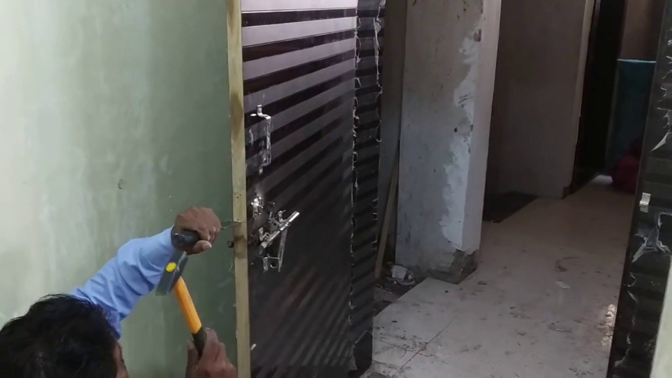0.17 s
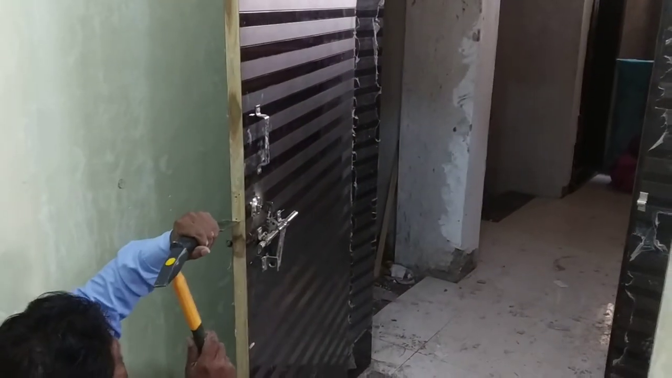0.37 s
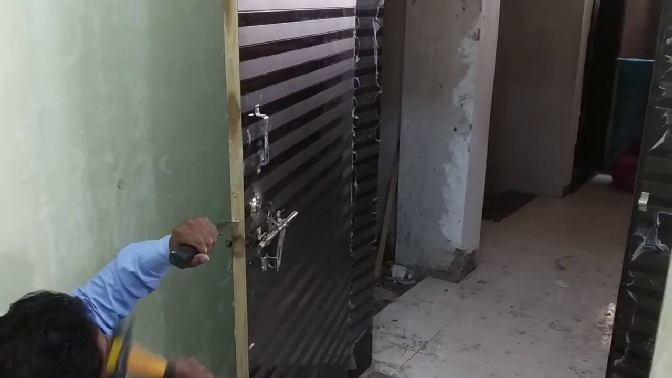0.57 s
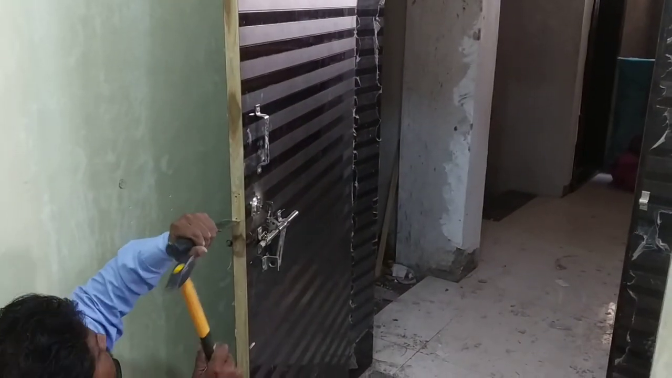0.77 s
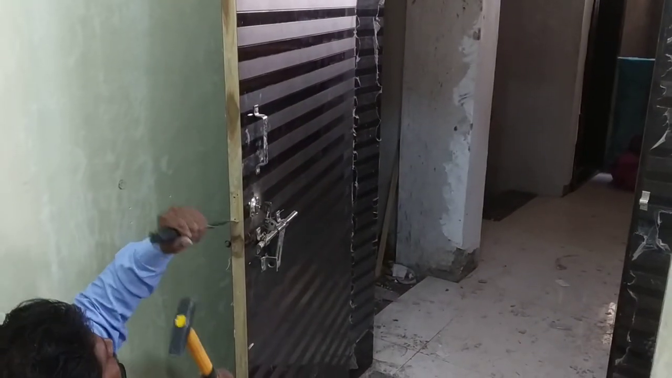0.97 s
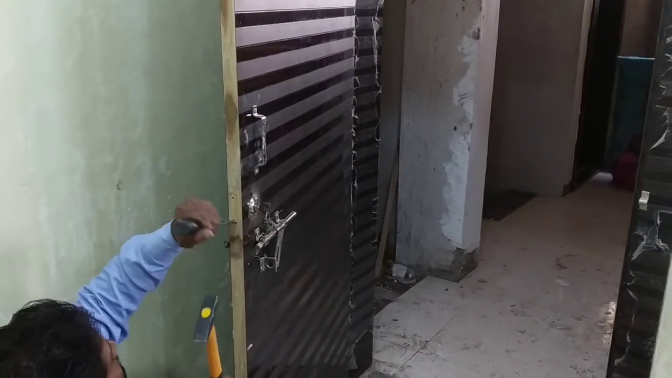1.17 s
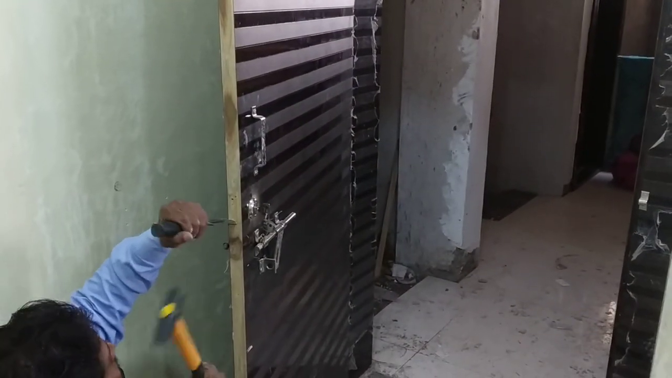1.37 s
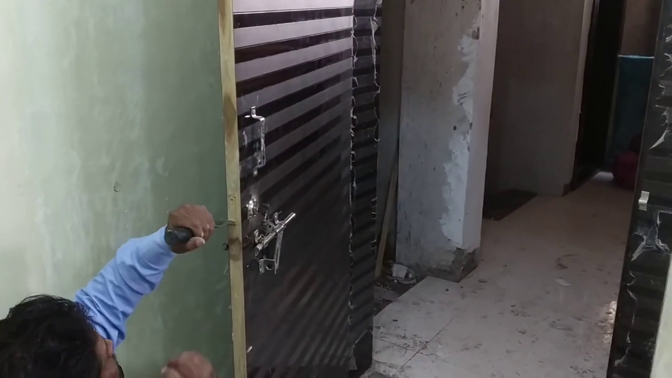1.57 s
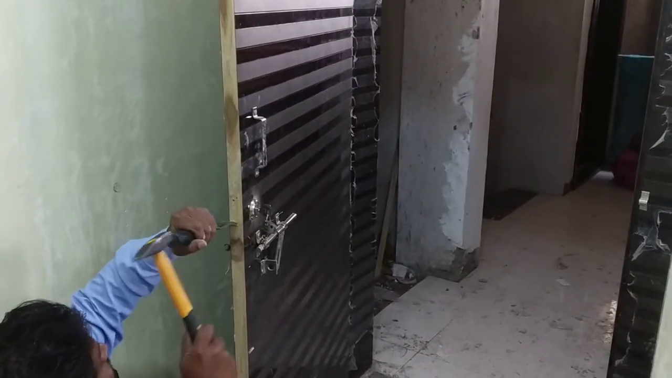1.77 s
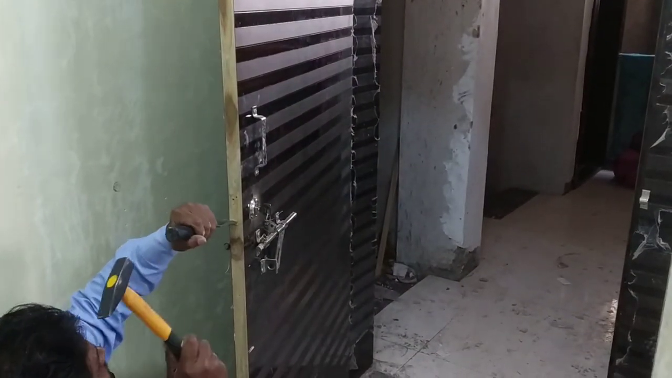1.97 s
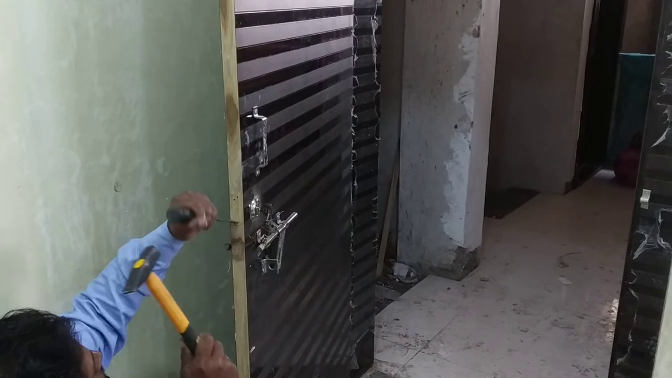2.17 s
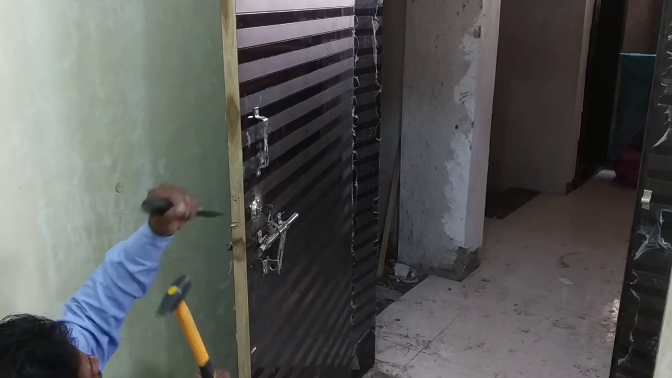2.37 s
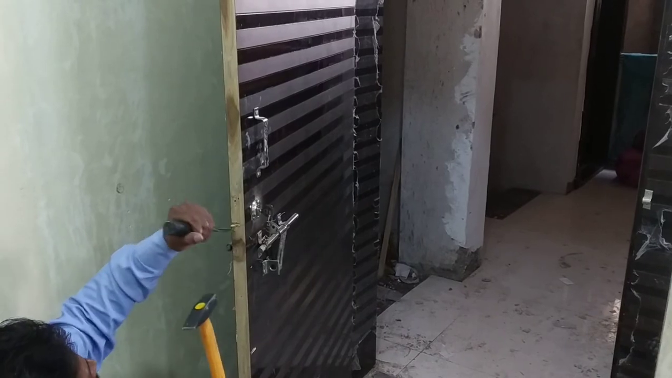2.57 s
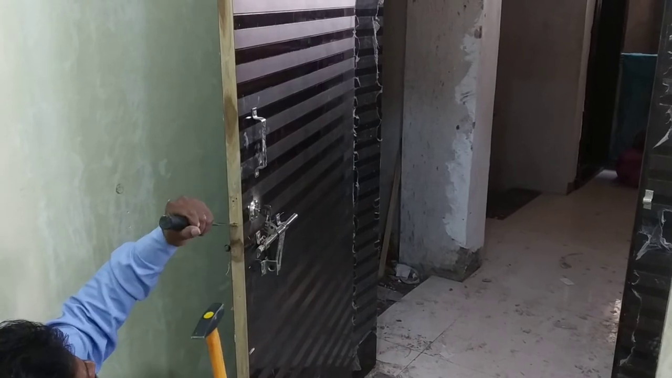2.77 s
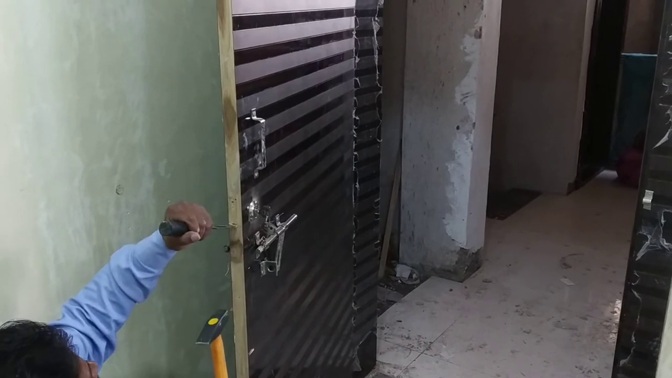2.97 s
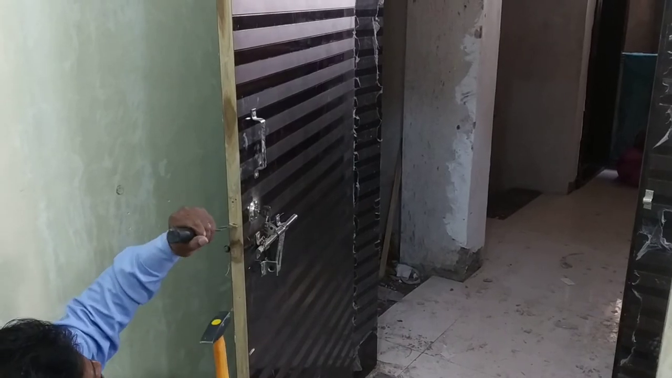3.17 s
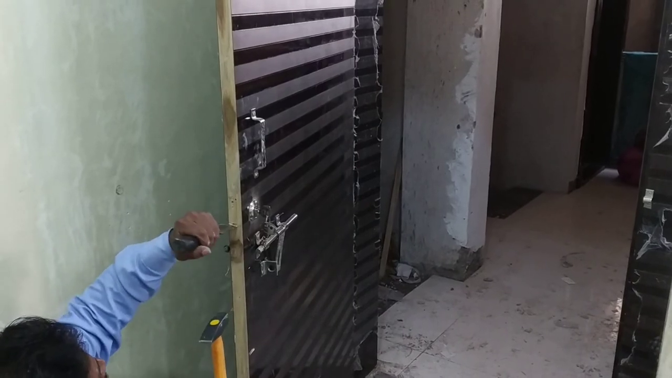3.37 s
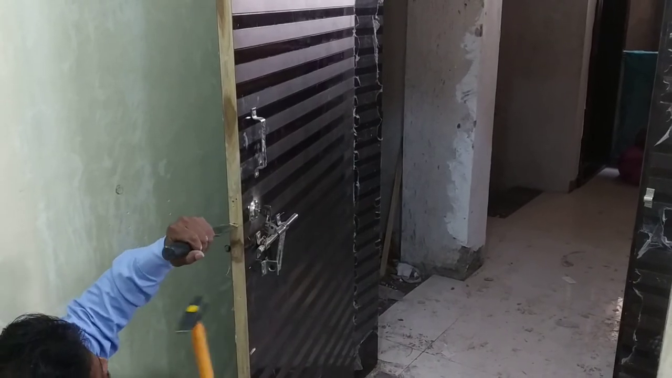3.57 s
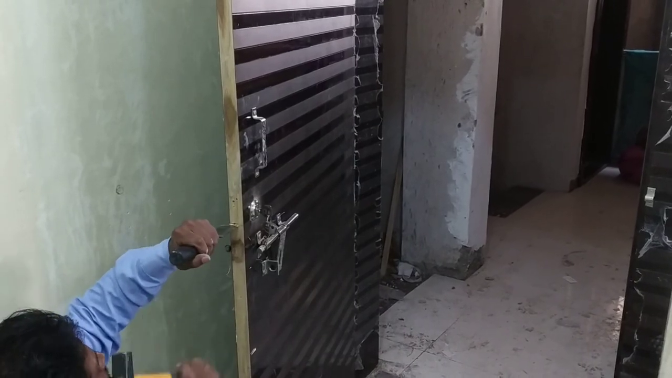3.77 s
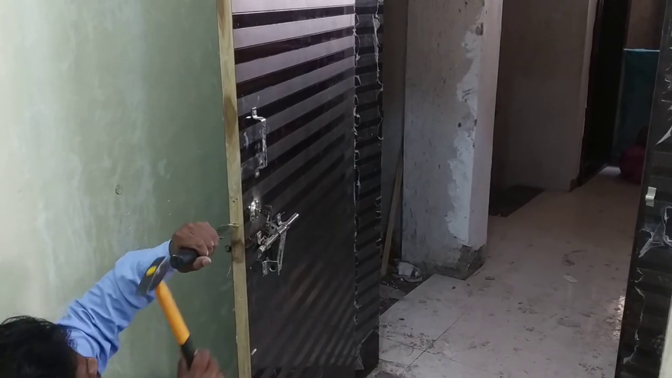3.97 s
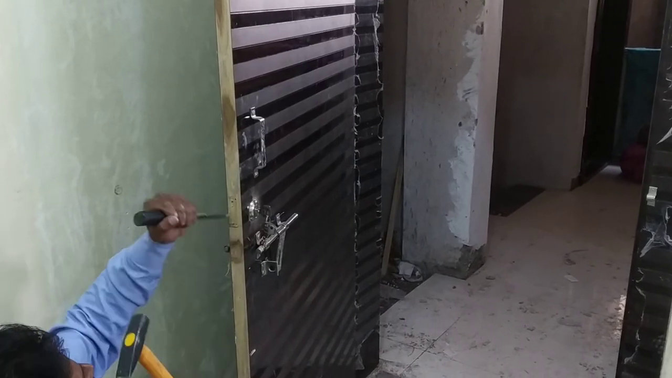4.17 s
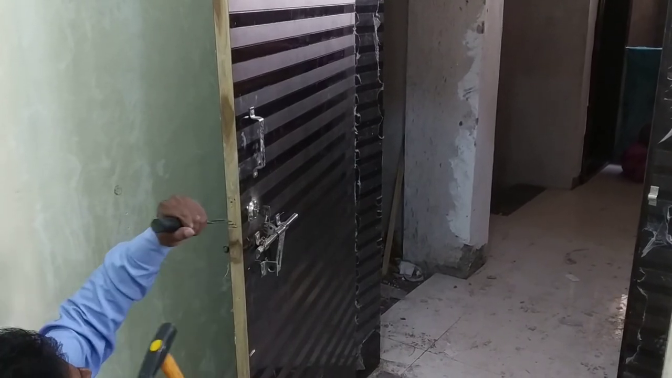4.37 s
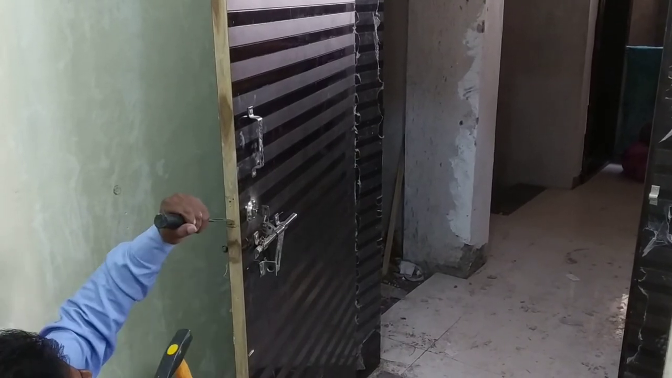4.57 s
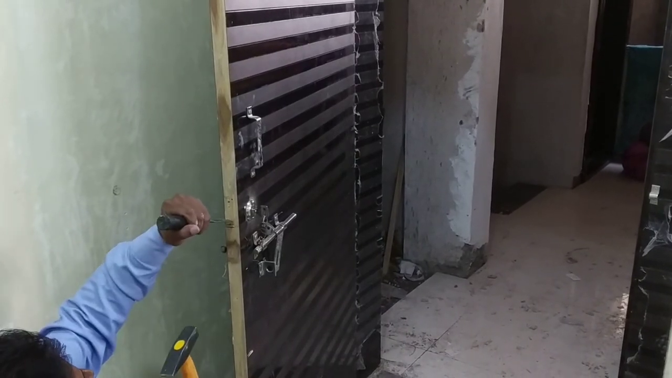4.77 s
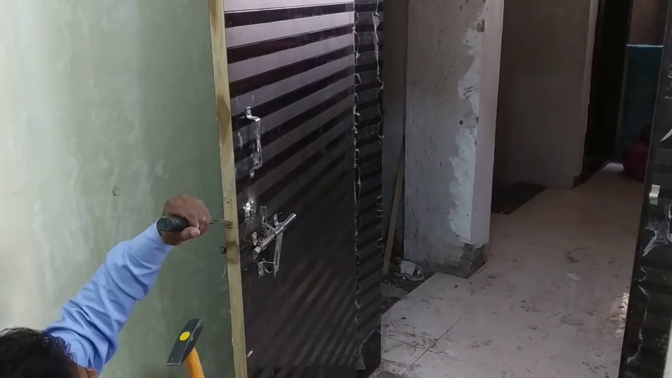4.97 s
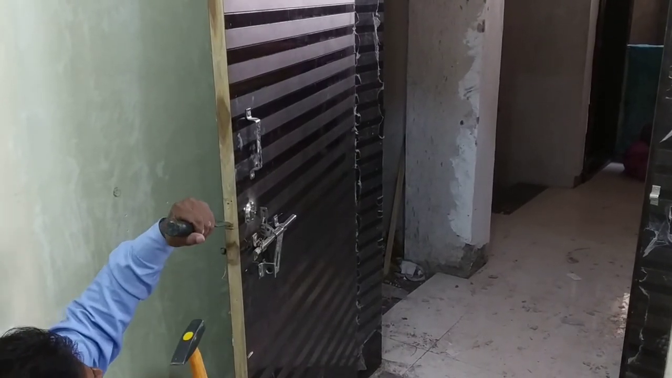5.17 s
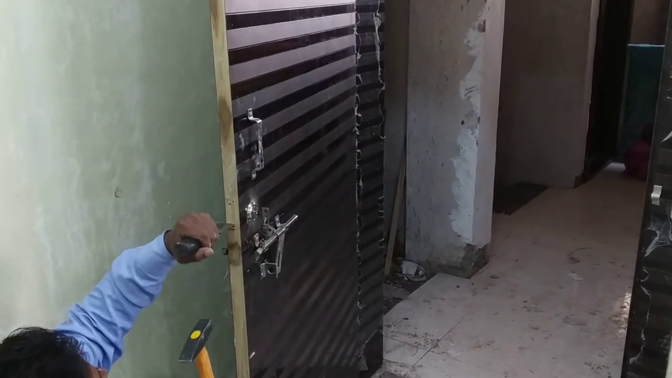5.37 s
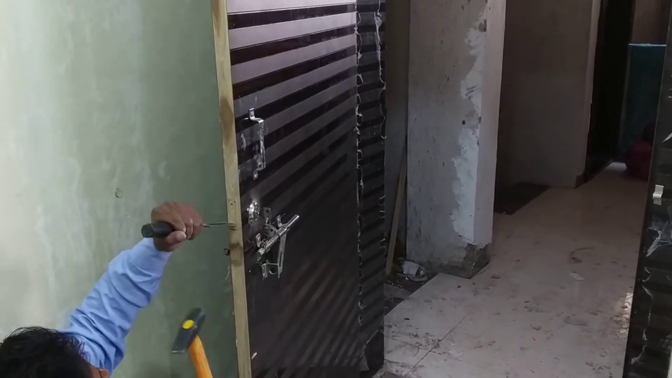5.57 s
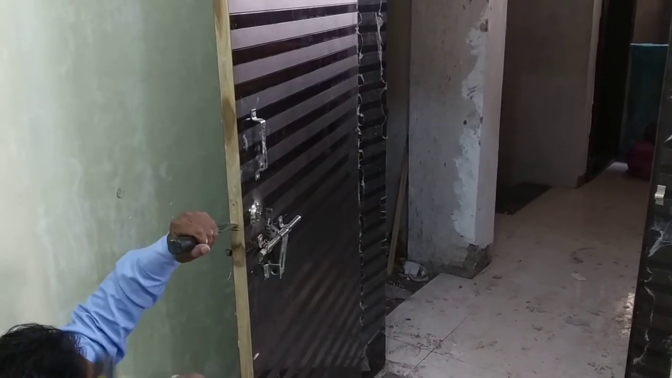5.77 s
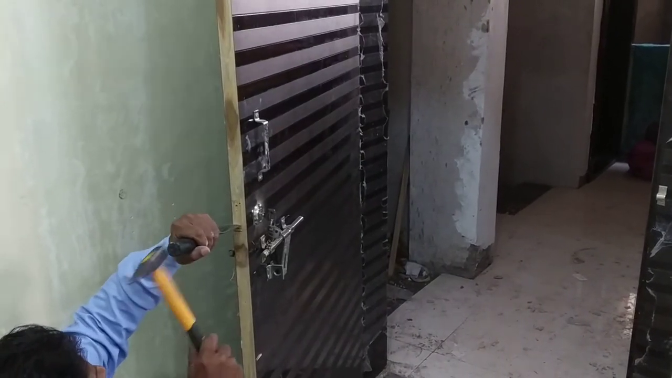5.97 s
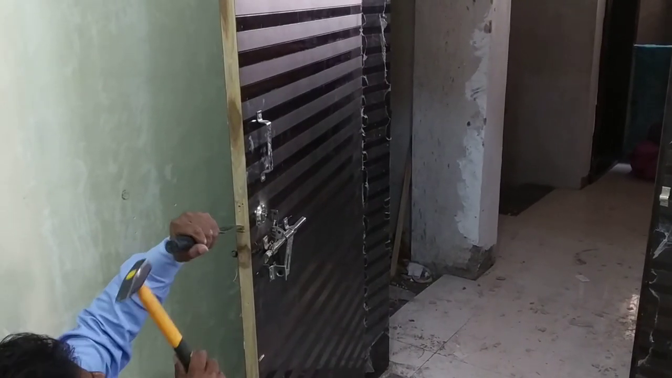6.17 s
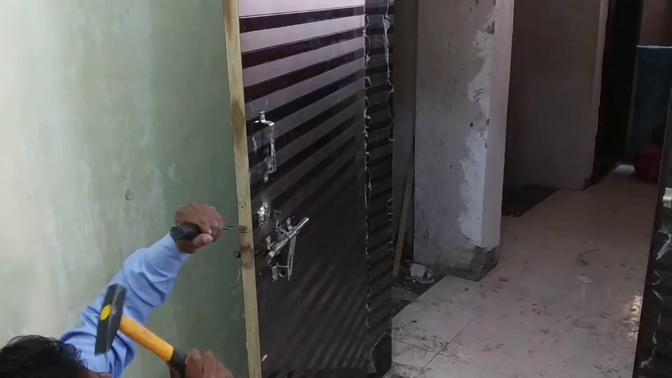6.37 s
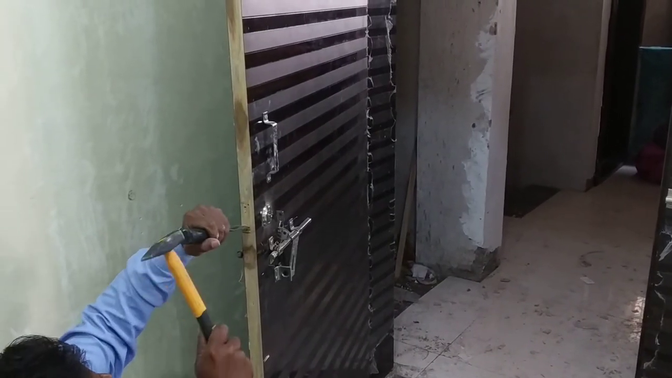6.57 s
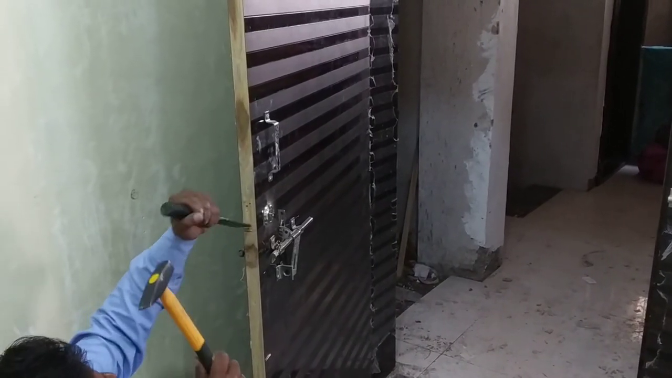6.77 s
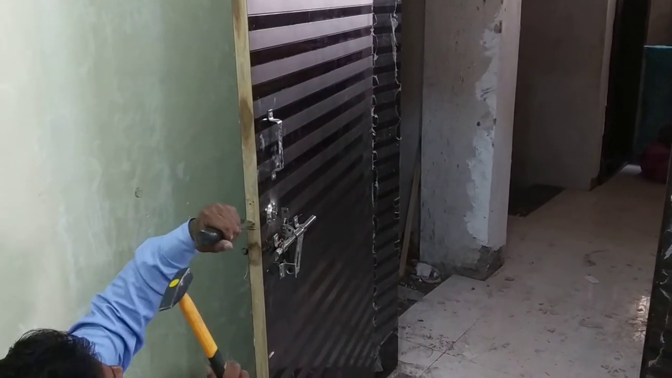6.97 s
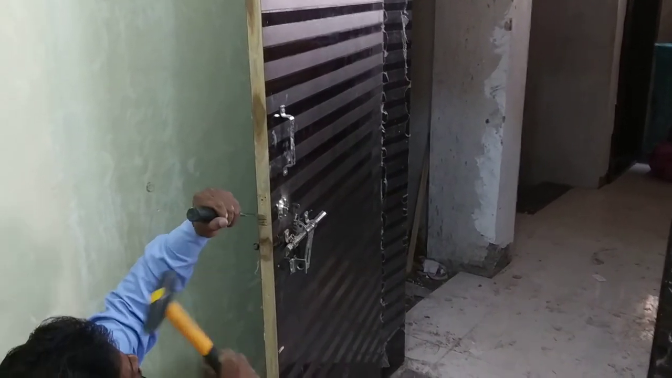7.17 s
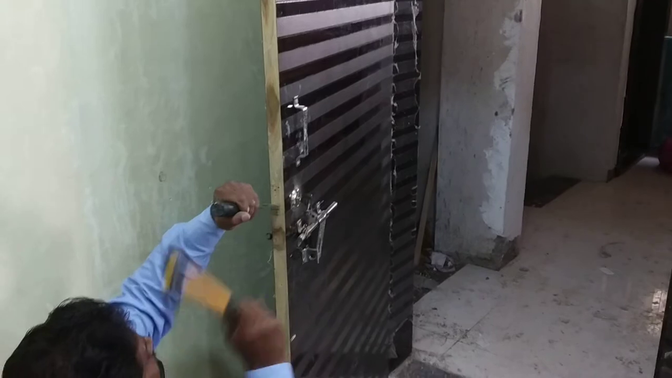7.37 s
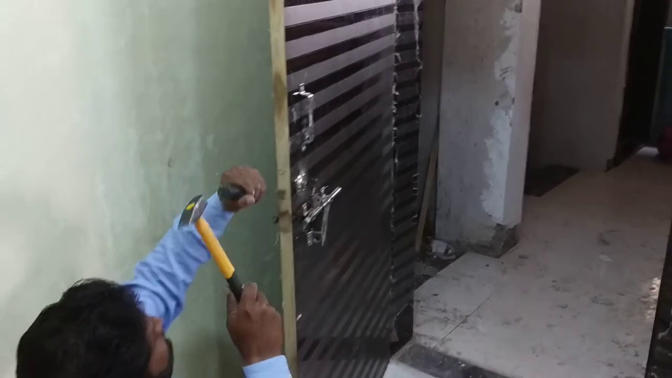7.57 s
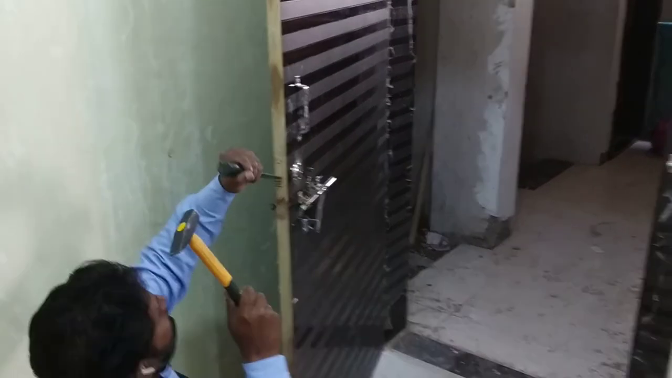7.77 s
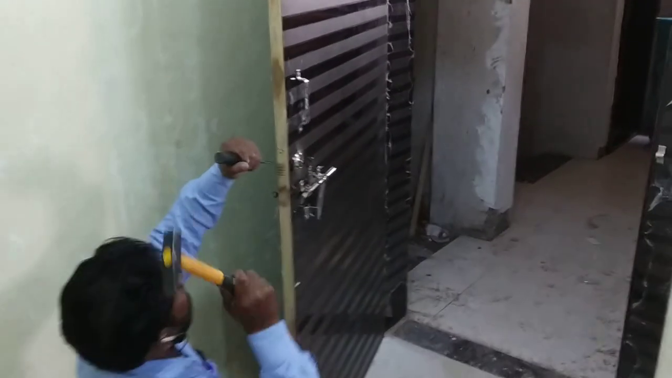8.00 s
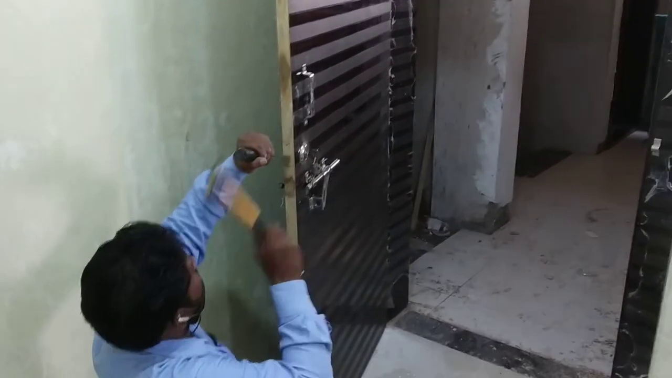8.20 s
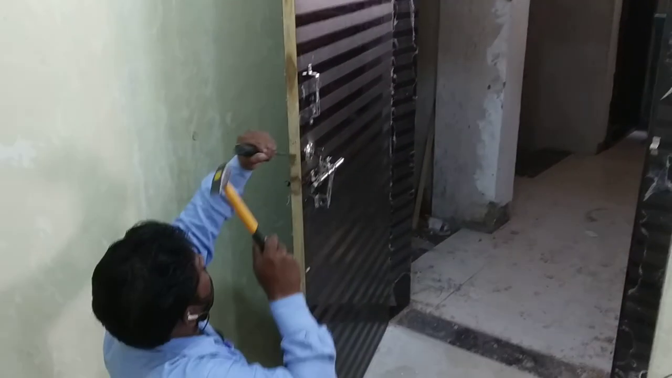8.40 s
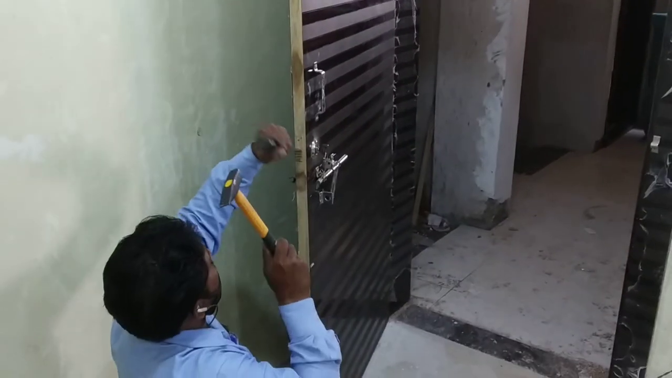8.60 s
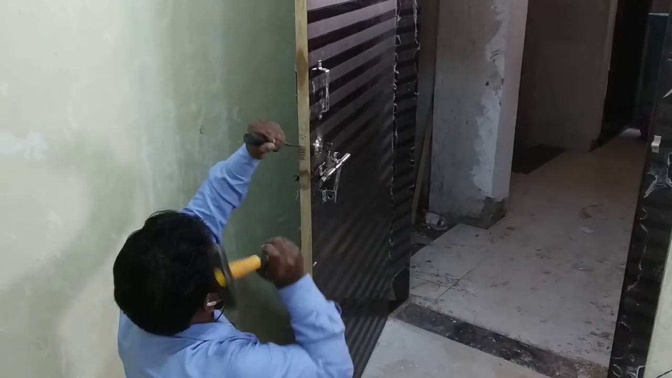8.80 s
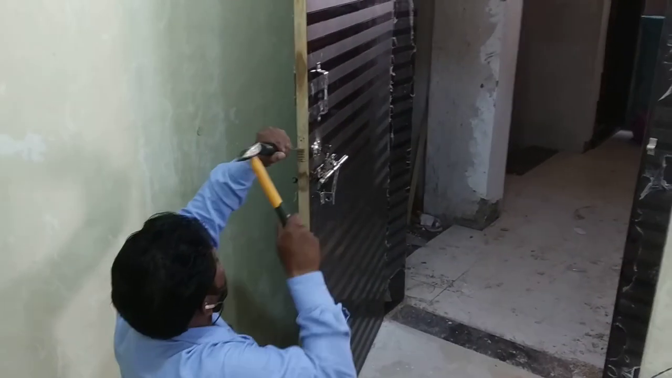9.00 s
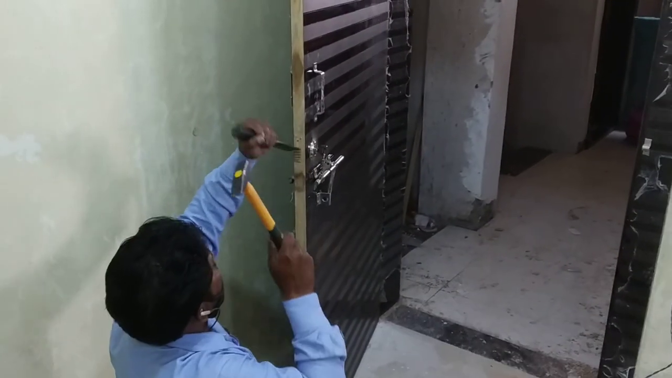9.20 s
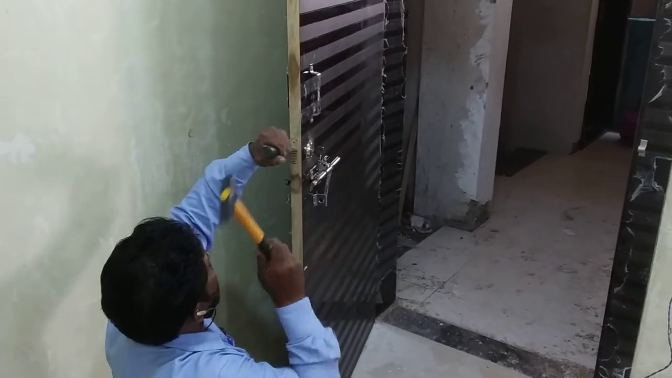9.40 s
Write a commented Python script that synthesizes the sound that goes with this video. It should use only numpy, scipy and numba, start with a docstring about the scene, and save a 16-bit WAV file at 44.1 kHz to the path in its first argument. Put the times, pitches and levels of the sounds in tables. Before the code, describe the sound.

Hard, ringing hammer blows on a chisel beside a sheet-steel door, with hollow knocks, scuffs and a brief squeak in a bare echoing passage.

```python
"""Chisel and steel door in a bare passage

A hammer drives a chisel into a door frame beside a sheet-steel door, in a bare, echoing passage.
Each blow is a noise crack and thud, decaying sines for the door, and a boom of noise bands that ring on.
Around them come hollow knocks (sines and clatter), a clink and a scrape (sines), and a squeak, scuffs
and ticks (filtered noise), over the quiet of the building. A fast limiter holds down the loud parts."""
import sys
import numpy as np
from scipy import signal
from scipy.fft import rfft, irfft, next_fast_len
from scipy.io import wavfile
from scipy.ndimage import uniform_filter1d
from numba import njit

SR = 44100
rng = np.random.default_rng(int(sys.argv[2]) if len(sys.argv) > 2 else 0)


def transcribe(signal):
    """Save signal, clipped to [-1, 1], as a 16-bit WAV file at the path in sys.argv[1]."""
    frames = np.atleast_2d(signal).T
    limited = np.clip(frames, -1, 1)
    pcm = np.round(limited * 32767).astype(np.int16)
    wavfile.write(sys.argv[1], SR, pcm)


N = 416304
T = np.arange(N) / SR
COARSE_T = T[::64]  # time grid for slow envelopes

# Levels are relative, ahead of the limiter.
# Quiet of the building: spectrum [pitch_hz, level_db per Hz]
FLOOR_COLOUR = [(25, 11.5), (60, -0.5), (130, 5), (300, -2), (500, -12.5), (1800, -7.5), (2800, -15),
                (9000, -18.5), (15500, -26.5)]
FLOOR_DB = -43.5
# Narrow ring still fading at the start [pitch_hz, width_hz, level_db, t60_s]
FADING_RING = [(1752, 33, -44, 2.6)]

# Passage: decay time before each source's lasting factor [pitch_hz, t60_s]
ROOM_DECAY = [(60, 1.34), (250, 1.59), (1000, 1.19), (3000, 1), (6000, 0.92), (10000, 0.65), (15000, 0.44)]
# Likeness of left and right in the noises [pitch_hz, likeness -1..1]
LIKENESS = [(60, 0.94), (250, 0.89), (500, 0.66), (800, 0.67), (1200, -0.2), (4000, -0.025), (15000, 0.13)]
# Balance of the echoes [pitch_hz, left_minus_right_db]
ECHO_BALANCE = [(60, -3.5), (250, 1), (600, -2.5), (1200, 2.5), (2400, 4.5), (5000, 0.5), (9000, 7.5)]
# Low modes of the passage that a knock sets ringing [pitch_hz, level_db]
PASSAGE_MODES = [(196, -3.5), (230, -8.5), (254, -1), (271, -5.5), (296, -0.5), (328, 0)]
# Echo bands in Hz: thirds of an octave, closer around 2.2 kHz, where the microphone's tone drops steeply
BANDS = np.sort(np.append(63 * 2 ** (np.arange(25) / 3), 2230))
FLUTTER_DB, FLUTTER_S = 1.8, .025  # echoes arrive in clumps, band by band

# Feet and cloth [start_s, swell_s, hold_s, t60_s, hiss_db, coarse_against_hiss_db]
SCUFF_EVENTS = [(0.179, 0.12, 0.018, 0.37, -34.5, -0.5), (1.514, 0.021, 0.21, .3, -39, -1),
                (2.055, 0.027, 0.088, 0.42, -40, 3), (2.217, .01, .01, 0.54, -35, -4),
                (2.749, 0.013, 0.0092, 0.21, -36.5, 9), (2.996, 0.091, 0.047, 1.23, -36.5, -5.5),
                (4.646, 0.024, 0.022, 0.92, -46, 3.5), (4.821, 0.028, 0.2, 0.58, -43, 0.5),
                (5.1, 0.029, 0.066, 0.58, -38.5, -10), (5.15, 0.045, 0.1, 0.63, -32, -3.5),
                (5.537, 0.04, 0.014, 0.53, -38, -7), (7.197, 0.094, 0.13, .3, -43, 6),
                (7.693, 0.025, 0.41, 1.3, -42.5, 8), (8.824, 0.017, .01, 1.5, -42.5, -1),
                (9.24, 0.032, .02, 0.53, -41, -8)]
# Bright ticks [start_s, level_db, t60_s, left_minus_right_db]
TICK_EVENTS = [(2.229, -20.5, 0.16, 14), (4.8029, -32.5, 0.097, 17), (5.5792, -34, 0.14, 10)]
# Thin tones of the chisel sliding [start_pitch_hz, glide_hz_per_s]
SCRAPE_TONES = [(1590, -150), (1800, 2398.5)]
SCRAPE_S, SCRAPE_HOLD_S, SCRAPE_DB, SCRAPE_WAVER_HZ = 1.7, 0.076, -41, 39.7
# Small steel part [pitch_hz, level_db, t60_s]
CLINK_PARTIALS = [(6045, -11, .5), (7623, -13, .5), (10030, -18, .35), (11460, -13, .4)]
CLINK_S, CLINK_DB = .28, -27.5
# Squeak resonances, the late tone first [pitch_hz, width_hz, level_db]
SQUEAK_RESONANCES = [(1952, 47, 2.5), (1773, 79, -10), (2370, 190, -3.5), (2630, 140, -3), (2800, 180, -11),
                     (3250, 350, -8), (4750, 780, -11)]
SQUEAK_S, SQUEAK_SWELL_S, SQUEAK_HOLD_S, SQUEAK_DB = 5.265, 0.042, 0.051, -31
SQUEAK_LATE_S = 0.023  # the first listed tone comes in after the others
SQUEAK_T60_S, SQUEAK_TAIL_T60_S, SQUEAK_TAIL_DB = 0.24, 0.75, -10  # slips stop short, passage rings on

# Something hollow set down or bumped
# [start_s, level_db, body_hz, body_width_hz, clatter_db, brightness_db per octave]
KNOCK_EVENTS = [(.357, -14, 614, 100, -21, -3), (2.099, -13.5, 203, 36, -36, 10),
                (2.489, -8.5, 207, 35, -4, 1.93), (2.763, -14, 205.3, 25, -7.5, -0.15),
                (3.438, -26.5, 262, 47, -9, -1), (3.517, -5, 276.6, 22, -7.5, -.5),
                (5.031, -28, 400, 99, -12.5, -5.5), (5.113, -29, 228, 46, 0, 1)]
# Clatter spectrum [pitch_hz, level_db per Hz]
CLATTER_COLOUR = [(120, -22.5), (300, -13.5), (550, -18), (900, -14.5), (1900, -18), (3400, -27.5),
                  (10600, -34.5), (15500, -49)]

# Hammer blows [start_s, strength_db, crack_db, door_sway_db, brightness_db per octave,
# upper_ring_db, middle_ring_db, clang_db]
BLOW_EVENTS = [(0.35, -28, -17, 13, -3, 4, -16, -2), (0.741, 1.5, 2.5, -0.5, 0, 1.5, -3.5, -7),
               (1.7095, 1.5, 3.5, 2.5, 1.43, -5.5, -1.5, 8.5), (3.8853, 2, 3, 1.5, 0.26, -2.5, 0.5, 2),
               (5.9793, 3.5, -2.5, 4, 0.3, -5, -6, -4), (6.5421, -3, 6.5, 3.5, -0.7, -3.5, 1.5, -1),
               (7.4274, 3, 5, 0.5, 1.07, 2, -8.5, 2.5), (8.237, 1.5, 5, 1, 1.47, -2, -2.5, 4.5),
               (8.9667, 3, 1, 2, 0.56, -2, -5.5, -4)]
EARLIER_S, EARLIER_DB = 1.22, 10  # a blow this long before the start still rings
CRACK_DB, SWAY_DB, BOOM_DB, CLATTER_DB = -8.5, -13.5, 15.5, 27  # layer levels at 0 dB strength
# Boom of frame and door, as the microphone hears it [pitch_hz, level_db per Hz]
BOOM_COLOUR = [(45, -25), (70, -21), (96, -23), (140, -15), (260, -16.5), (360, -12), (520, -16), (750, -5),
               (1000, -3.5), (1400, -6), (1950, -14), (2250, -28), (2800, -22), (4300, -27), (9000, -32.5),
               (12000, -32), (15500, -68)]
# Upper ring, middle ring and clang within the boom [pitch_hz, width_octaves]
BOOM_RINGS = [(1880, 0.29), (1310, 0.55), (2280, 0.27)]
# Steel on steel [pitch_hz, level_db per Hz]
CRACK_COLOUR = [(880, -38), (1500, 19.5), (2160, -13), (2880, 4.5), (5070, -2), (7030, -3.5), (9280, -0.5),
                (16000, -6)]
THUD_PEAK_S, THUD_DB = 0.0088, -1.5  # the frame answers the crack a moment later
# Door panel and frame, t60 before the lasting factor [pitch_hz, width_hz, level_over_boom_db, t60_s]
DOOR_MODES = [(359, 21.5, 1, 1.9), (453.6, 37, 1.5, 1.17), (604, 31, 0, 0.8), (740, 35, -5.5, 0.36),
              (923, 22, -4.5, 1.26), (836, 14, -4, 0.58), (1171, 27, -7, 1.33), (1752, 350, 2.5, 1.31)]
# Two deep door modes that start opposed and beat [pitch_hz, level_db, t60_s]
SWAY_MODES = [(39.5, -4, 1.05), (41.3, -2.5, 1.57)]
# Clear low modes of the door panel [pitch_hz, level_db, t60_s]
PANEL_MODES = [(134, -22.5, 1.8), (155.7, -28, 1.6), (236.6, -29.5, 2.17), (355.7, -15.5, 1.35),
               (363.8, -13, 0.78)]
PANEL_RISE_S = 0.04

TOP_HZ = 16300  # nothing much is heard above this


def undb(db):
    """dB to gain."""
    return 10 ** (np.asarray(db) / 20)


def unit(x):
    """Scale to rms 1."""
    return x / np.sqrt(np.mean(x ** 2))


def on_log(table, hz):
    """Read a (Hz, value) table on a log-frequency axis."""
    f, v = np.transpose(table)
    return np.interp(np.log(np.maximum(hz, 1)), np.log(f), v)


def colour(x, table):
    """Shape the spectrum by (Hz, dB) points."""
    hz = np.arange(x.shape[-1] // 2 + 1) * SR / x.shape[-1]
    return irfft(rfft(x) * undb(on_log(table, hz)), x.shape[-1])


def band(x, lo_hz, hi_hz):
    """Band-pass."""
    edges = [lo_hz, min(hi_hz, .45 * SR)]
    return signal.sosfilt(signal.butter(2, edges, "band", fs=SR, output="sos"), x)


def stereo_noise(count):
    """Two noises, alike in the bass and nearly unrelated in the treble."""
    likeness = np.clip(on_log(LIKENESS, np.arange(count // 2 + 1) * SR / count), -1, 1)
    shares = np.sqrt(np.array([1 + likeness, 1 - likeness]) / 2)
    mid, side = rfft(rng.standard_normal((2, count))) * shares
    return irfft(np.array([mid + side, mid - side]), count)


def ring(modes, phases, count):
    """Decaying sines."""
    t = T[:count]
    return sum(undb(db) * np.sin(2 * np.pi * hz * t + phase) * 1000 ** (-t / t60)
               for (hz, db, t60), phase in zip(modes, phases))


def burst(t60, count):
    """A dying puff of noise."""
    return rng.standard_normal(count) * 1000 ** (-T[:count] / max(t60, .001))


def swell(start, rise, hold, t60):
    """Envelope that swells in, holds, dies away."""
    age = T - start
    dying = 1000 ** (-np.maximum(age - rise - hold, 0) / max(t60, .02))
    return np.clip(age / max(rise, .002), 0, 1) ** 2 * dying


def add(out, x, s):
    """Mix x into out from time s."""
    i = int(s * SR)
    out[..., i:i + x.shape[-1]] += x[..., :out.shape[-1] - i]


def pan(x, db):
    """Place by a left minus right level."""
    return x * undb(np.array([db, -db]) / 2).reshape(2, -1)


def building_quiet(noise):
    """Steady noise, strongest in the bass, as the quiet of the building."""
    return undb(FLOOR_DB) * unit(colour(np.roll(noise, N // 2, axis=1), FLOOR_COLOUR))


def thin_ring():
    """A narrow band of noise dying away as the scene opens."""
    return sum(undb(db) * unit(band(stereo_noise(count=N), hz - w / 2, hz + w / 2)) * 1000 ** (-T / t60)
               for hz, w, db, t60 in FADING_RING)


def scuffs(noise):
    """Gritty hiss of soles and cloth with a coarser part below, and a few bright ticks of noise."""
    grit = undb(1.7 * np.repeat(rng.exponential(size=N // 16), 16))
    hiss = unit(band(noise * grit, 4900, 11900))
    coarse = unit(band(np.roll(noise, SR, axis=1), 750, 2930))
    fine_power = sum((undb(db) * swell(*shape)) ** 2 for *shape, db, _ in SCUFF_EVENTS)
    coarse_power = sum((undb(db + coarse_db) * swell(*shape)) ** 2
                       for *shape, db, coarse_db in SCUFF_EVENTS)
    out = pan(np.sqrt(fine_power) * hiss + np.sqrt(coarse_power) * coarse, 7.4)
    for s, db, t60, pan_db in TICK_EVENTS:
        tick = band(burst(t60, SR // 2), 8500, 14300)
        add(out, pan(undb(db) * tick, pan_db), s)
    return out


def scrape():
    """A faint slide of steel: two wavering tones, one gliding up and one slightly down."""
    drift = uniform_filter1d(rng.standard_normal((len(SCRAPE_TONES), N)), size=512, axis=1)
    sliding_s = np.clip(T - SCRAPE_S, 0, .5)
    glides = np.array([hz + glide * sliding_s for hz, glide in SCRAPE_TONES])
    hz = glides + SCRAPE_WAVER_HZ * unit(drift)
    tones = np.sin(2 * np.pi * np.cumsum(hz, axis=1) / SR).sum(axis=0)
    return undb(SCRAPE_DB) * swell(SCRAPE_S, SQUEAK_SWELL_S, SCRAPE_HOLD_S, SQUEAK_T60_S) * tones


def clink():
    """A small steel part rings in groups of close partials, with a puff of noise."""
    out = np.zeros(N)
    detune = 1 + .005 * rng.standard_normal(4 * len(CLINK_PARTIALS))
    # close partials flutter
    close = [(hz * d, db, t60) for (hz, db, t60), d in zip(CLINK_PARTIALS * 4, detune)]
    ringing = ring(close, 2 * np.pi * rng.random(len(close)), count=SR)
    rise = 1 - np.exp(-T[:SR] / 0.0027)
    puff = 0.53 * band(burst(0.25, SR), 250, 10000)
    add(out, undb(CLINK_DB) * (rise * ringing + puff), CLINK_S)
    return out


def squeak():
    """Dense uneven slips excite a few narrow resonances, one of them entering late."""
    slips = rng.standard_normal(N) * undb(1.5 * np.repeat(rng.exponential(size=N // 144), 144))
    late_tone, *others = [undb(db) * unit(band(slips, hz - w / 2, hz + w / 2))
                          for hz, w, db in SQUEAK_RESONANCES]
    shape = SQUEAK_S, SQUEAK_SWELL_S, SQUEAK_HOLD_S
    tail = undb(SQUEAK_TAIL_DB) * swell(*shape, SQUEAK_TAIL_T60_S)
    envelope = undb(SQUEAK_DB) * np.maximum(swell(*shape, SQUEAK_T60_S), tail)
    late_envelope = np.interp(T - SQUEAK_LATE_S, T, envelope)
    return envelope * sum(others) + late_envelope * late_tone


def knocks():
    """A boxy resonance rung by a soft push; the passage's modes nearest to it ring on and beat."""
    out, t = np.zeros((2, N)), T[:SR]
    for s, db, hz, width_hz, *_ in KNOCK_EVENTS:
        wavering = unit(band(stereo_noise(count=SR), hz - width_hz / 2, hz + width_hz / 2))
        wavering = wavering * 1000 ** (-t / (1.1 + 14 / width_hz))
        body = undb(-2) * ring([(hz, 0, 7 / width_hz)], [0], count=SR)
        body = body + undb(-22) * wavering
        # passage modes answer less the further they lie from the body's pitch
        near = [(f, d - 20 * np.log10(1 + ((f - hz) / width_hz) ** 2), 1.6) for f, d in PASSAGE_MODES]
        if hz < 300:  # only the low knocks
            body = body + undb(-7.0) * ring(near, np.zeros(len(near)), count=SR)
        push = 1 - np.exp(-t * hz / 1.4)
        add(out, undb(db) * body * push, s - .006)
    return out


def energy(hits, hz, t60, times):
    """Amplitude in one band: each hit builds up (lows later), dies away, and their powers add."""
    power = 0
    for s, db, table, tilt_db, rise_s, lasting in hits:
        age = np.maximum(COARSE_T - s, 0)
        start = undb(db + on_log(table, hz) + tilt_db * np.log2(hz / 1000))
        build_up = 1 - np.exp(-age / (rise_s + 3 / hz))
        decay = np.exp(-np.log(1000) * age / (lasting * t60))
        power = power + (start * build_up * decay) ** 2
    return np.interp(times, COARSE_T, np.sqrt(power))


def echoes(hits, door_hits):
    """Dense reverberation in overlapping third octaves, and the door's modes as narrow wavering bands."""
    count = 8 * next_fast_len(N // 8 + 1)
    noise, f = rfft(stereo_noise(count)), np.arange(count // 2 + 1) * SR / count
    # the walls' resonances bunch unevenly
    clusters = np.interp(f, f[::256], rng.standard_normal(len(f[::256])))
    noise = noise * undb(2.2 * clusters * (f > 450))
    low, high = np.zeros((2, count // 8)), np.zeros((2, count))

    def play(shape, who, hz, t60):
        """One band of noise follows its hits; low bands run at an eighth of the rate."""
        out = low if hz < 2100 else high
        size = out.shape[1]
        bins = size // 2 + 1
        wave = irfft(noise[:, :bins] * shape(f[:bins]), size) * size / count
        times, clumps = np.arange(size) * count / size / SR, np.arange(0, count / SR, FLUTTER_S)
        flutter = np.interp(times, clumps, undb(FLUTTER_DB * rng.standard_normal(len(clumps))))
        add(out, pan(wave, on_log(ECHO_BALANCE, hz)) * energy(who, hz, t60, times) * flutter, 0)

    for hz in BANDS:
        # each band fades linearly into its neighbours
        play(lambda f: on_log(np.transpose([BANDS, BANDS == hz]), f), hits, hz, on_log(ROOM_DECAY, hz))
    for hz, width_hz, db, t60 in DOOR_MODES:
        play(lambda f: undb(db) / (1 + (2 * (f - hz) / width_hz) ** 2), door_hits, hz, t60)
    return (high + 8 * irfft(rfft(low), count))[:, :N]


def boom(*ring_db):
    """The boom's spectrum, with its three rings as strong as this blow shakes them."""
    def lift(hz):
        return sum(db * np.exp(-(np.log2(hz / centre) / width) ** 2)
                   for db, (centre, width) in zip(ring_db, BOOM_RINGS))
    return [(hz, db + lift(hz)) for hz, db in BOOM_COLOUR]


def blows():
    """The crack of steel on steel, the frame's quick thud, then the deep sway and low ring of the door."""
    out, t = np.zeros((2, N)), T[:2 * SR]
    short_t = T[:2048]
    sway = ring(SWAY_MODES, [0, np.pi], count=2 * SR) * (1 - np.exp(-t / 0.11))
    age = short_t / THUD_PEAK_S
    for s, db, crack_db, sway_db, *_ in BLOW_EVENTS:
        hit = unit(colour(stereo_noise(count=2048), CRACK_COLOUR))
        crack = band(hit, 3200, 13000) * 1000 ** (-short_t / 0.063)
        thud = undb(THUD_DB) * band(hit, 610, 2900) * (age * np.exp(1 - age)) ** 2
        add(out, pan((crack + thud) * undb(db + crack_db + CRACK_DB), 0.93), s)
        add(out, pan(undb(db + sway_db + SWAY_DB) * sway, -1.1), s)
        panel = ring(PANEL_MODES, 2 * np.pi * rng.random(len(PANEL_MODES)), count=2 * SR)
        add(out, undb(db) * panel * (1 - np.exp(-t / PANEL_RISE_S)), s)
    return out


def scene():
    """All sources, their echoes and the quiet of the building."""
    earlier = (-EARLIER_S, EARLIER_DB) + (0,) * 6
    # hits: start_s, level_db, spectrum, brightness_db per octave, rise_s, lasting factor on t60
    struck = [(s + 0.0021, db + BOOM_DB, boom(*ring_db), tilt_db, .002, .92)
              for s, db, _, _, tilt_db, *ring_db in [earlier] + BLOW_EVENTS]
    bumped = [(s - .004, db + clatter_db + CLATTER_DB, CLATTER_COLOUR, tilt_db, .006, .72)
              for s, db, _, _, clatter_db, tilt_db in KNOCK_EVENTS]
    noise = stereo_noise(count=N)
    background = building_quiet(noise) + thin_ring() + scuffs(noise)
    small_metal = pan(scrape() + clink() + squeak(), 11.7)
    return background + small_metal + knocks() + echoes(struck + bumped, struck) + blows()


@njit
def follow(x, attack, release):
    """Envelope that rises fast and falls slowly."""
    y, e = np.empty(len(x)), 0.
    for i in range(len(x)):
        e += (x[i] - e) * (attack if x[i] > e else release)
        y[i] = e
    return y


def record(dry):
    """One limiter for both microphone channels, soft clipping, steep top cut."""
    attack_s, release_s, threshold_db = 0.00049, 0.053, -1.5
    envelope = follow(np.abs(dry).max(axis=0), 1 / (attack_s * SR), 1 / (release_s * SR))
    # a power above 1 presses louder passages slightly below the threshold
    held = dry * np.minimum(1, undb(threshold_db) / (envelope + 1e-9)) ** 1.074
    top_cut = signal.ellip(10, .2, 80, TOP_HZ, fs=SR, output="sos")
    return signal.sosfilt(top_cut, np.tanh(held))


dry = scene()
out = record(dry)
transcribe(out)
```